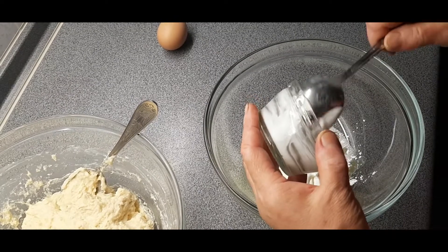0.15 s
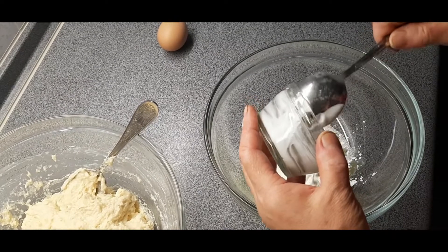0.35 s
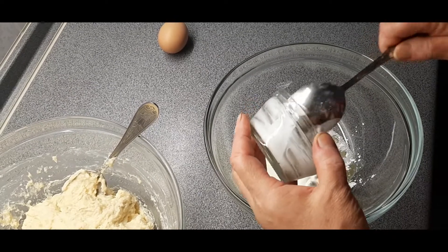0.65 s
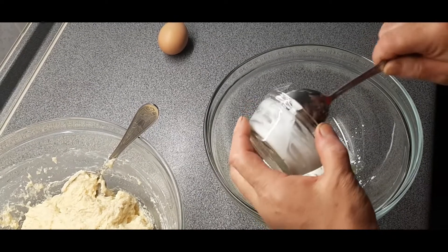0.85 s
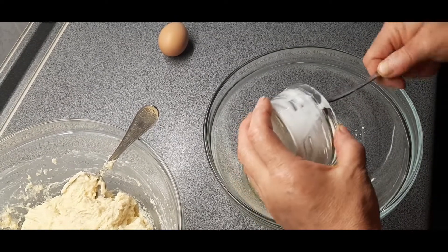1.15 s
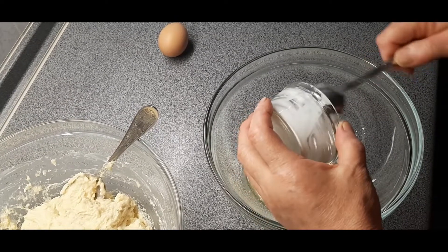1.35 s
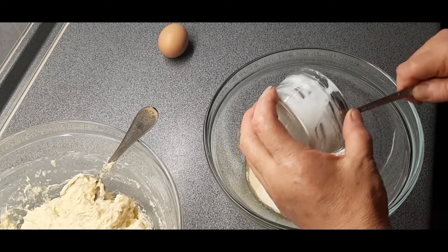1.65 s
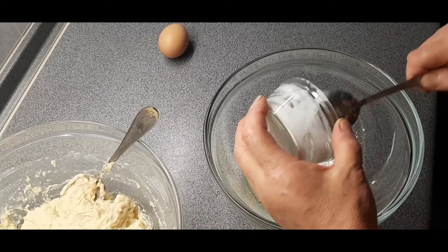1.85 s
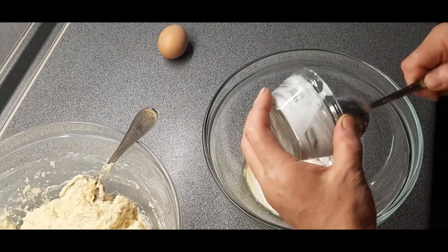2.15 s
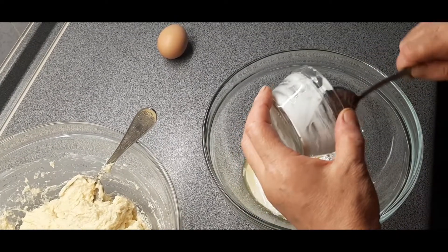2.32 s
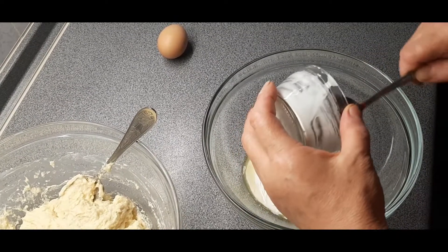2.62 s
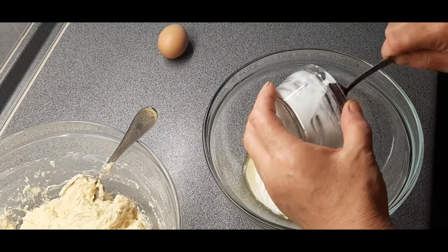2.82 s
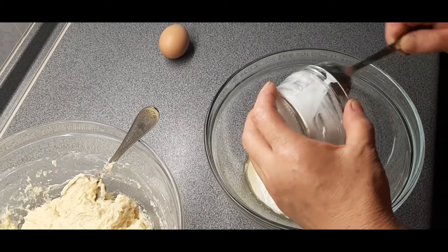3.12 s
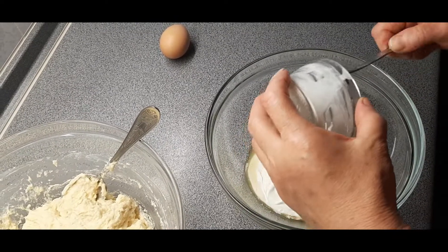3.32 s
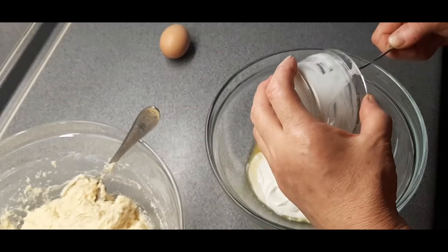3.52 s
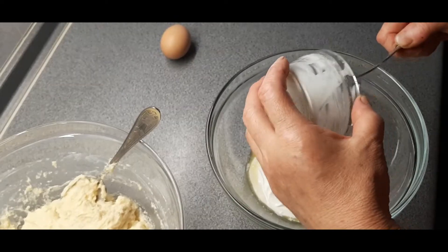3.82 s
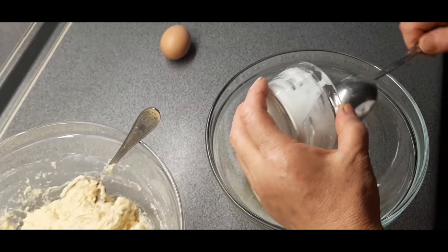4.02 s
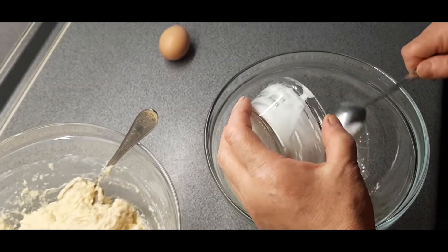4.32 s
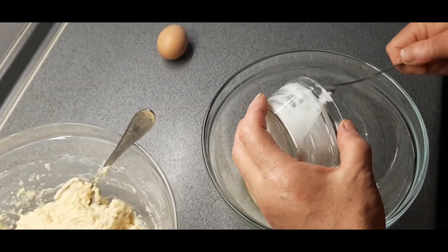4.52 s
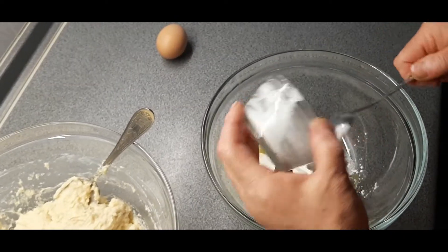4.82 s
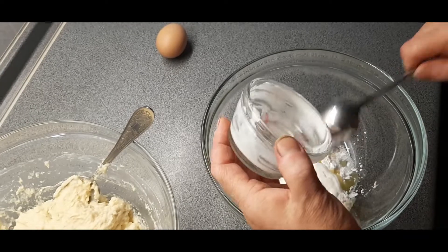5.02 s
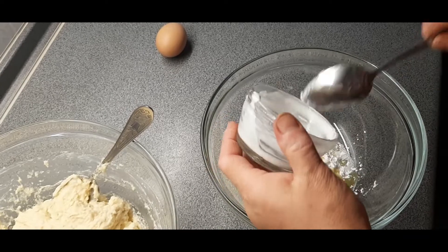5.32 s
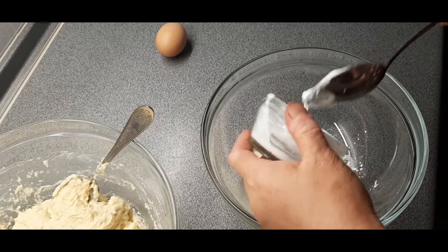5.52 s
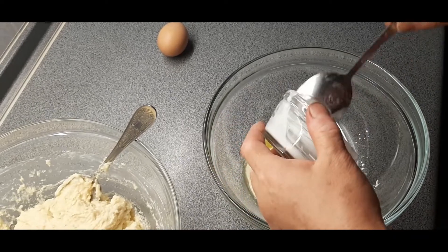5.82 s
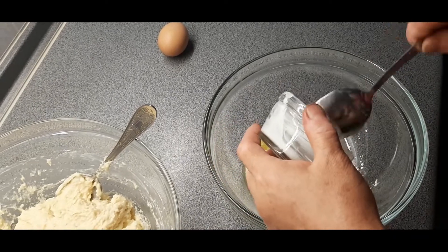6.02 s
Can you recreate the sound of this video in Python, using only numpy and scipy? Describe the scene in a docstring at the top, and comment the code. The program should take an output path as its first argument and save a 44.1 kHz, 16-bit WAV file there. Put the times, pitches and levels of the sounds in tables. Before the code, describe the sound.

Close glassy clinks, dull clacks and brief scrapes as a metal spoon scoops thick cream from a little jar over a mixing bowl.

```python
"""Spoon and cream jar, close up

In a kitchen, a steel spoon scoops thick cream from a small hand-held glass jar over a mixing bowl.
The jar is close, right of the microphone. Knocks are random clicks ringing a bank of damped modes.
Scrapes are dense clicks through the same glass; the hollow, squeals and squeaks are noise-driven tones.
Left is mostly scatter from bowl and counter; the room answers both sides over quiet air, hum and hiss."""
import sys
import numpy as np
from scipy import signal
from scipy.fft import rfft, irfft, next_fast_len
from scipy.io import wavfile
from scipy.ndimage import map_coordinates

SR = 44100
rng = np.random.default_rng(int(sys.argv[2]) if len(sys.argv) > 2 else 0)


def persist_wave(psi):
    """Save psi, clipped to +-1, as 16-bit WAV."""
    counts = np.round(np.clip(psi, -1, 1) * 32767).astype(np.int16)
    wavfile.write(sys.argv[1], SR, np.atleast_2d(counts).T)


N = 271389
TIME = np.arange(N) / SR
RING_TIME = TIME[:SR // 5]

# Spoon meets glass: t/s, strength/dB, depth (0 on the rim, 1 far down the wall), chatter time/s
SPOON_KNOCKS = [(0.0404, -26.5, 0.076, 0.013), (0.1024, -16.5, 1, 0.0048), (0.375, -21.5, 0.27, .012),
                (0.44, -18.5, 0.91, 0.0024), (0.5666, -29, 0.011, 0.0008), (0.7238, -19.5, .2, .016),
                (0.8297, -15.5, 0.62, .002), (1.3497, -29.5, 0.9, 0.011), (1.461, -20.5, 0.47, .003),
                (1.5068, -19.5, 0.12, 0.0019), (2.0532, -22, 0.51, .013), (2.1165, -23, 1, 0.00077),
                (2.3342, -34.5, 0.61, 0.0049), (2.535, -21.5, 0.28, 0.013), (2.5911, -24.5, 0.84, 0.00042),
                (2.601, -19.5, 0.44, .0014), (3.053, -27.5, 0.47, .013), (3.3095, -19.5, 0.62, .0015),
                (3.416, -36, 0.81, .0039), (3.6824, -46.5, 0.77, .004), (4.549, -16.5, 0.38, 0.0045),
                (5.6674, -18.5, 0.28, .019), (5.7372, -28, 0.012, .0081), (5.8167, -25, 0.38, 0.0066),
                (5.898, -37, 0.81, 0.0008), (6.084, -17, .7, 0.018)]
RIM_HZ, RIM_RISE_HZ_PER_S = 2781.4, 38   # the rim's pitch climbs as the jar is emptied
# levels relative to strength, before the register trims in knock(); DEPTH is the change at full depth
RIM_DB, RIM_DEPTH_DB = 11.0, -21.5
CLACK_DB, CLACK_DEPTH_DB = -8.5, 7.5   # the low clack grows with depth
SPARKLE_DB = -11.0   # top of the spectrum


def knocks():
    """All blows of the spoon on the jar: the rim rings near the mouth, the wall clacks further down."""
    out = np.zeros(N + SR)
    for s, db, depth, chatter_s in SPOON_KNOCKS:
        rim_hz = RIM_HZ + RIM_RISE_HZ_PER_S * s
        rim_db = db + RIM_DB + RIM_DEPTH_DB * depth
        clack_db = db + CLACK_DB + CLACK_DEPTH_DB * depth
        sound = knock(rim_hz, rim_db, clack_db, db, db + SPARKLE_DB, chatter_s)
        at = round(s * SR)
        out[at:at + len(sound)] += sound
    return out[:N]


def knock(rim_hz, rim_db, clack_db, tick_db, sparkle_db, chatter_s,
          rim_t60=.036, rim_rise_s=.0015, twin_db=-8.5, twin_ratio=0.94,
          even_s=0.0051, chatter_hz=5000, zing_db=-4.0, push_db=-27.0):
    """One blow and its dying chatter; levels are rms as if all of it came within 10 ms."""
    size = len(RING_TIME)
    chatter_s = max(chatter_s, 1 / SR)
    # cream cushions the later touches; chatter lasting even_s has as much energy as the first touch
    clicks = grains(size, per_s=2500, spread_db=8.0) * np.exp(-RING_TIME / chatter_s)
    chatter = cut(clicks, chatter_hz, "low", order=1)
    first_touch = RING_TIME == 0
    force = np.sqrt(chatter_s / even_s) * unit_energy(chatter) + first_touch
    body = signal.fftconvolve(force, glass(crack_db=3.5, crack_t60=0.031))[:size]
    # the jar is not quite round, so its rim mode has a lower twin that beats with it
    held_t60 = rim_t60 * (1 + chatter_s / .012)
    twins = mode(rim_hz, held_t60) + from_db(twin_db) * mode(rim_hz * twin_ratio, held_t60)
    rim = twins * (1 - np.exp(-RING_TIME / rim_rise_s))
    # a long push moves the whole jar
    low_db = tick_db + push_db + 10 * np.log10(.5 + .5 * chatter_s / even_s)
    # place and hardness of the contact set how much each register rings
    registers = [(rim, rim_db + 1),
                 (cut(body, 650, "low"), low_db),
                 (cut(body, [850, 2350], "band"), clack_db),
                 (cut(body, [2800, 5600], "band", order=4), tick_db - 1.0),
                 (cut(body, [6100, 8400], "band", order=4), (tick_db + sparkle_db) / 2 + zing_db),
                 (cut(body, 9210, "high", order=6), sparkle_db + 2.5)]
    return sum(from_db(db) * unit_energy(part) for part, db in registers) * np.sqrt(SR / 10 ** 2)


# Jar and spoon ringing together: f/Hz, relative level/dB, t60/s
JAR_MODES = [(1100, -14.5, .04), (1442, -8, 0.076), (1562, 1.5, 0.067), (1692, -3.5, 0.074),
             (1830, 2.5, 0.034), (2004, -2, 0.12), (2413, -2, .06), (3320, -9, 0.02), (3518, -5, 0.037),
             (4034, -1, 0.038), (4226, -4, 0.04), (4540, -11, 0.036), (6030, -10, 0.094), (6390, -5.5, .1),
             (6624, -11.5, 0.16), (7610, -4.5, 0.081), (7637, -7, 0.06), (11050, 0, .065),
             (10960, -3.5, 0.025), (14300, -8.5, 0.11)]
# The mass of short-lived modes that makes the crack: f/Hz, relative level/dB per Hz
CRACK_COLOUR = [(60, -33), (300, -25), (700, -18.5), (1150, -10), (1700, 1.5), (2300, 2.5), (3400, 0.5),
                (5300, -6.5), (7800, -4), (8700, -21), (9800, -23), (11000, -5), (13200, -15.5),
                (15500, -16.5)]


def glass(crack_db, crack_t60, vary_db=0.0, detune=0.0029, radiate_hz=850):
    """Answer of jar and spoon to one click; each call redraws the modes' signs and slight detuning."""
    rings = 0
    for hz, db, t60 in JAR_MODES:
        weight = from_db(db + rng.normal(0, vary_db)) * rng.choice([-1, 1])
        rings = rings + weight * mode(hz * (1 + rng.normal(0, detune)), t60)
    rings = cut(rings, radiate_hz, "high", order=2)   # a small body radiates little bass
    burst = rng.standard_normal(len(RING_TIME)) * from_db(-60 * RING_TIME / crack_t60)
    crack = colour(burst, CRACK_COLOUR)
    return unit_energy(unit_energy(rings) + from_db(crack_db) * unit_energy(crack))


def scraping():
    """All that sounds while the spoon slides: the glass, the air pocket and the squeal of the edge."""
    scrape, pocket, hollow_hz, squeal_hz = strokes()
    squeal = from_db(SQUEAL_DB) * scrape * stirred(squeal_hz, SQUEAL_WIDTH_HZ)
    return drag(scrape + skids()) + hollow(pocket, hollow_hz) + squeal


# Spoon dragged along the wall: t/s, length/s, scrape level/dB, hollow level/dB (both at mid-stroke),
# swell over the stroke/dB, hollow f/Hz at the start, hollow f/Hz at the end
DRAG_STROKES = [(0.171, 0.068, -73, -34.5, -2, 1826, 1600), (.49, 0.049, -74, -37, -3.5, 1700, 1600),
                (2.13, 0.21, -46, -48.5, -15, 1540, 1150), (2.68, 0.12, -57, -64.5, 3.5, 1703, 1700),
                (3.108, 0.21, -56.5, -52.5, -8.5, 1141, 1110), (3.88, .085, -65.5, -60.5, -2, 1660, 1300),
                (4.668, 0.093, -29.5, -47.5, 2, 1095, 1300), (5.753, 0.0303, -40, -43.5, -5, 1054, 1300),
                (5.85, 0.042, -36, -37.5, -5.5, 1726, 1800)]
STROKE_ATTACK_S, STROKE_RELEASE_S = .016, 0.0047
# the squeal climbs over each stroke; width is to each side, level relative to the scrape
SQUEAL_HZ, SQUEAL_RISE_HZ, SQUEAL_WIDTH_HZ, SQUEAL_DB = 3200, 230, 70, -5


def strokes():
    """Scrape gain, hollow gain, hollow pitch and squeal pitch; each moves steadily within a stroke."""
    scrape, pocket = 0, 0
    hollow_hz, squeal_hz = DRAG_STROKES[0][-1], SQUEAL_HZ
    for s, length, scrape_db, hollow_db, swell_db, start_hz, end_hz in DRAG_STROKES:
        progress = np.clip((TIME - s) / length, 0, 1)
        begun = TIME > s - 2 * STROKE_ATTACK_S
        swell = from_db(swell_db * (progress - .5))
        pressure = gate(s, length, STROKE_ATTACK_S, STROKE_RELEASE_S) * swell
        scrape = scrape + from_db(scrape_db) * pressure
        pocket = pocket + from_db(hollow_db) * pressure
        hollow_hz = np.where(begun, start_hz + (end_hz - start_hz) * progress, hollow_hz)
        squeal_hz = np.where(begun, SQUEAL_HZ + SQUEAL_RISE_HZ * progress, squeal_hz)
    return scrape, pocket, hollow_hz, squeal_hz


# a knock chattering for SKID_CHATTER_S skids on at SKID_DB re its strength; longer chatter skids harder
SKID_CHATTER_S, SKID_DB, SKID_FADE_DB_PER_S = 0.014, -12.5, 130.5


def skids():
    """Gain of the short slide that follows each knock, in proportion to its chatter time."""
    gain = 0
    for s, db, _, chatter_s in SPOON_KNOCKS:
        fade = from_db(db + SKID_DB - SKID_FADE_DB_PER_S * np.abs(TIME - s))
        gain = gain + (TIME > s) * chatter_s / SKID_CHATTER_S * fade
    return gain


def drag(gain, uneven_db=3.0, rim_db=-6.0, rim_hz=3010, rim_t60=0.069, wander_s=.0003):
    """Dense slips under a wavering hand keep the glass ringing; cream dulls the top."""
    slips = grains(N, per_s=1100, spread_db=2.5) * from_db(uneven_db * drift(50))
    slips = unit_energy(slips) * np.sqrt(N) * gain
    body = glass(crack_db=2.0, crack_t60=.02) + from_db(rim_db) * mode(rim_hz, rim_t60)
    body = colour(body, [(1600, -2.5), (4000, 2.5), (5500, -5.5), (7000, -2.5), (12000, -9)])
    scrape = signal.fftconvolve(slips, unit_energy(body))[:N]
    # the travelling contact bends the resonances a little
    return map_coordinates(scrape, [(TIME + wander_s * drift(9.7)) * SR], order=3)


def hollow(gain, hz, width_hz=70, skirt_hz=300, skirt_db=-6.5, uneven_db=3.0):
    """Uneven rubbing stirs the air pocket behind the spoon, whose pitch follows its size."""
    air = stirred(hz, width_hz) + from_db(skirt_db) * stirred(hz, skirt_hz)
    return gain * from_db(uneven_db * drift(40)) * air


# The spoon's edge catches and the glass squeaks: t/s, f/Hz, level/dB at the crest
EDGE_SQUEAKS = [(.808, 2833, -25.5), (2.158, 3260, -32), (2.248, 3303, -29.5), (2.287, 3260, -32.5),
                (3.13, 3040, -39.5), (3.197, 3200, -35.5), (3.878, 3250, -55), (4.606, 3020, -31),
                (4.629, 3020, -30.5), (5.83, 2410, -22), (5.873, 3910, -31)]
SQUEAK_WIDTH_HZ, SQUEAK_RISE_S = 55, 0.0036   # width to each side; time from onset to crest


def squeaks():
    """Brief catches of the spoon's edge; each swells and dies within a few hundredths of a second."""
    out = 0
    for s, hz, db in EDGE_SQUEAKS:
        age = np.clip((TIME - s) / SQUEAK_RISE_S, 0, 20)
        out = out + from_db(db) * age * np.exp(1 - age) * stirred(hz, SQUEAK_WIDTH_HZ)
    return out


# treble above CREAM_HZ starts slightly dulled and brightens steadily
CREAM_HZ, CREAM_START_DB, CREAM_CLEARS_DB_PER_S = 6000, -2.5, 0.92


def cream(x):
    """Cream on the glass muffles the treble, which opens up as the jar is emptied."""
    low = cut(x, CREAM_HZ, "low", order=1)
    return low + (x - low) * from_db(CREAM_START_DB + CREAM_CLEARS_DB_PER_S * TIME)


# Faint tones that come and go between the scoops: t/s, length/s, f/Hz, level/dB
SOFT_TONES = [(0.27, .12, 470, -62), (1.12, .2, 4100, -75.5), (1.57, .22, 205, -74.5),
              (2.43, .08, 450, -72), (2.96, .08, 450, -71.5), (3.95, .12, 440, -69),
              (4.06, .33, 2820, -68.5), (4.9, .2, 1500, -71.5), (5.02, .07, 1950, -69)]
FAINT_WIDTH_SHARE, FAINT_FADE_S = .022, 0.043   # width to each side as a share of pitch; fade in and out


def faint_tones():
    """Soft narrow tones, noise-driven, that fade in and out."""
    out = 0
    for s, length, hz, db in SOFT_TONES:
        fade = gate(s, length, FAINT_FADE_S, FAINT_FADE_S)
        out = out + from_db(db) * fade * stirred(hz, FAINT_WIDTH_SHARE * hz)
    return out


def bowl(x, scatter_db=7.0, t60=0.072):
    """The sound and its quick scatter from the mixing bowl and the counter."""
    scatter = rng.standard_normal(len(RING_TIME)) * from_db(-60 * RING_TIME / t60)
    direct = RING_TIME == 0
    paths = direct + from_db(scatter_db) * unit_energy(scatter)
    return signal.fftconvolve(x, unit_energy(paths))[:N]


# Kitchen reverberation by band: f/Hz, t60/s, level/dB
KITCHEN_BANDS = [(200, .5, -8.5), (800, 0.22, -2.5), (1710, 0.82, -17.5), (2900, 0.37, -12),
                 (4540, 0.21, -11), (6800, 0.36, -17), (11000, 0.3, -19), (15000, 0.34, -18)]


def kitchen(x, build_s=0.0037):
    """Diffuse reverberation on one side: noise that decays at its own rate in each band."""
    hz, t60, db = np.transpose(KITCHEN_BANDS)
    t = TIME[:SR]
    white = rng.standard_normal(SR)
    bins = np.log(np.maximum(np.fft.rfftfreq(SR, 1 / SR), 1))
    tail = 0
    for share, decay, level in zip(np.eye(len(hz)), t60, db):
        band = irfft(rfft(white) * np.interp(bins, np.log(hz), share), SR)
        envelope = from_db(-60 * t / decay) * (1 - np.exp(-t / build_s))
        tail = tail + band * from_db(level) * unit_energy(envelope)
    return signal.fftconvolve(x, tail)[:N]


# A thin hiss swells in the pauses: t/s of the crest, level/dB
HISS_CRESTS = [(4.48, -61.5), (5.6, -64)]
HISS_REST_DB, HISS_RISE_DB_PER_S, HISS_FALL_DB_PER_S = -86.5, 17, 26.5


def hiss_swell():
    """Gain of the hiss: it creeps up to each crest and sinks back to rest."""
    swells = []
    for s, db in HISS_CRESTS:
        below_crest = np.maximum(HISS_RISE_DB_PER_S * (s - TIME), HISS_FALL_DB_PER_S * (TIME - s))
        swells.append(db - below_crest)
    return from_db(np.maximum(np.max(swells, axis=0), HISS_REST_DB))


# Faint wavering tones in the room: f/Hz, mid level/dB
HUM_TONES = [(88, -87.5), (200, -84), (240, -86)]
# Air of the still kitchen: f/Hz, relative level/dB per Hz
AIR_COLOUR = [(25, -2), (50, -7), (90, 1), (130, -4), (200, 0), (300, -4), (450, 2), (800, -14),
              (1700, -7.5), (2900, -5), (4500, -17), (7500, -21), (9000, -33.5), (16000, -18)]
# Colour of the hiss: f/Hz, relative level/dB per Hz
HISS_COLOUR = [(500, -10.5), (2000, -2), (2900, 3), (4000, -1.5), (7700, 1), (8300, -11), (9900, -11.5),
               (11000, 2.5), (14000, -2.5), (16000, -4.5)]
AIR_DB = -73.5   # the air common to both sides, before the left side's trim


def background(own_db=0.0, left_db=-6.0, waver_db=3.0):
    """Quiet room air and hum, partly alike on both sides, and the thin hiss."""
    hum = sum(from_db(db + waver_db * drift(2)) * stirred(hz, 4.2) for hz, db in HUM_TONES)
    shared = noise(AIR_COLOUR)
    hiss_gain = hiss_swell()
    sides = []
    for side in range(2):
        air = from_db(AIR_DB) * (shared + from_db(own_db) * noise(AIR_COLOUR))
        sides.append(hum + air + hiss_gain * noise(HISS_COLOUR))
    return np.array(sides) * from_db([[left_db], [0]])


def from_db(db):
    """Decibels to gain."""
    return 10 ** (np.asarray(db) / 20)


def unit_energy(x):
    """Scale so that the squares sum to one."""
    return x / np.sqrt(np.sum(x ** 2) + 1e-20)


def colour(x, points):
    """Shape a signal by (f/Hz, level/dB) points; minimum phase, so nothing sounds early."""
    hz, db = np.transpose(points)
    size = 2 * next_fast_len(len(x))
    bins = np.maximum(np.fft.rfftfreq(size, 1 / SR), 1)
    gain = from_db(np.interp(np.log(bins), np.log(hz), db))
    cepstrum = irfft(np.log(gain))
    # folding the cepstrum onto positive time gives minimum phase
    cepstrum[1:size // 2] *= 2
    cepstrum[size // 2:] = 0
    return irfft(rfft(x, size) * np.exp(rfft(cepstrum)))[:len(x)]


def noise(points, size=N):
    """Coloured noise of rms one."""
    return unit_energy(colour(rng.standard_normal(size), points)) * np.sqrt(size)


def cut(x, hz, kind, order=3):
    """Butterworth filter."""
    return signal.sosfilt(signal.butter(order, hz, kind, fs=SR, output="sos"), x)


def drift(hz):
    """Slow random wander of spread one, drawn at every eighth sample and interpolated."""
    steps = TIME[::8]
    white = rng.standard_normal(len(steps) + SR // 8)   # one second of run-in
    slow = cut(white, hz * 8, "low", order=2)[-len(steps):]   # times 8 for the coarser step
    return np.interp(TIME, steps, slow / np.std(slow))


def grains(size, per_s, spread_db):
    """Tiny catches of steel on glass: random clicks of uneven strength."""
    strength = from_db(spread_db * np.minimum(rng.exponential(1, size), 4))
    return (rng.random(size) < per_s / SR) * strength * rng.choice([-1, 1], size)


def mode(hz, t60):
    """One dying sine of unit energy."""
    return unit_energy(np.sin(2 * np.pi * hz * RING_TIME) * from_db(-60 * RING_TIME / t60))


def stirred(hz, width_hz):
    """A resonance kept going by random rubbing; its pitch may glide; rms about one."""
    rubbing = drift(width_hz) + 1j * drift(width_hz)
    phase = 2 * np.pi * np.cumsum(hz + np.zeros(N)) / SR
    return np.real(rubbing * np.exp(1j * phase))


def gate(s, length, attack_s, release_s):
    """Rise to one by time s, hold for the length, then die away."""
    rise = np.maximum((s - TIME) / attack_s, 0) ** 2
    fall = np.clip((TIME - s - length) / release_s, 0, 40)
    return np.exp(-rise - fall)


# Colour of the sound reaching the left side of the microphone: f/Hz, level/dB
LEFT_COLOUR = [(600, -3), (1600, -11.5), (2900, -14), (4500, -8), (7000, -5), (11000, -7.5), (14000, -3)]
RIM_BEAMING = 0.38   # share of the rim's band kept from the walls


def scene():
    """The jar is close and to the right; the left side hears it mostly as scatter and room."""
    jar = cream(knocks() + scraping() + squeaks()) + faint_tones()
    left = colour(bowl(jar), LEFT_COLOUR)
    # the rim beams its ring upward, so less of it reaches the walls
    spread = jar - RIM_BEAMING * cut(jar, [2620, 3080], "band", order=1)
    room = np.array([kitchen(spread), kitchen(spread)])
    return np.array([left, jar]) + room + background()


CUTOFF_HZ = 15900


def record(dry):
    """The microphone channel clips peaks at full scale, then a steep low-pass cuts the top."""
    low_pass = signal.ellip(10, .1, 80, CUTOFF_HZ, fs=SR, output="sos")
    return signal.sosfilt(low_pass, np.clip(dry, -1, 1))


dry = scene()
out = record(dry)
persist_wave(out)
```